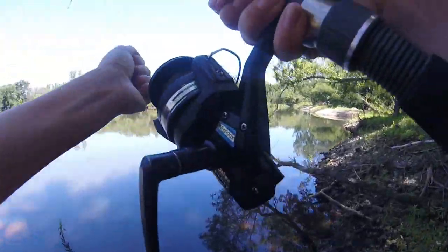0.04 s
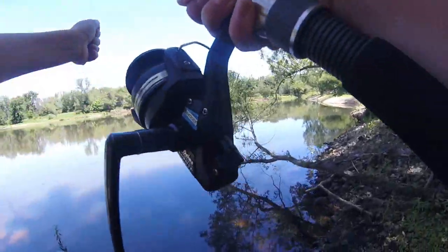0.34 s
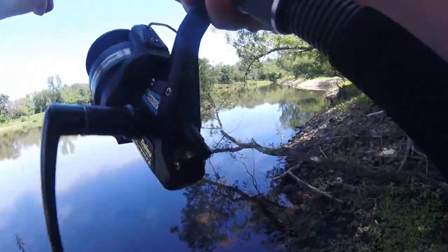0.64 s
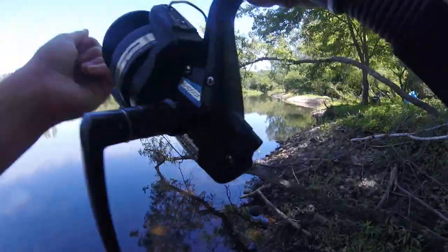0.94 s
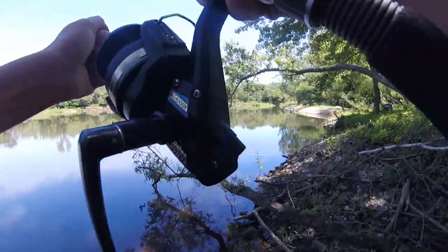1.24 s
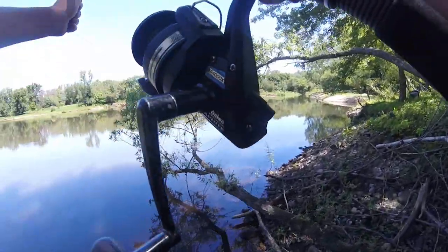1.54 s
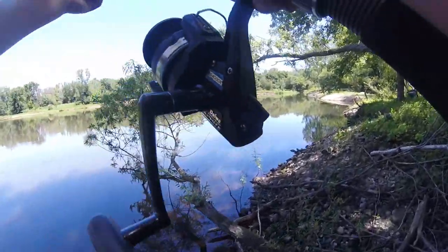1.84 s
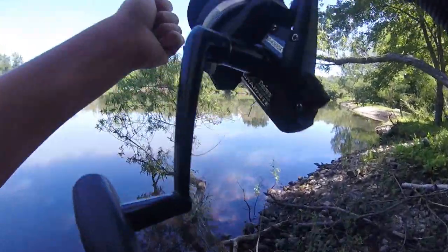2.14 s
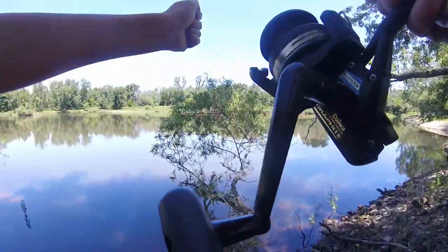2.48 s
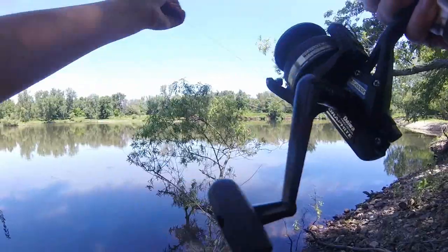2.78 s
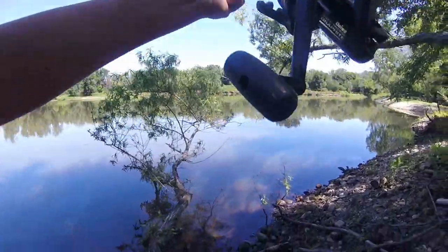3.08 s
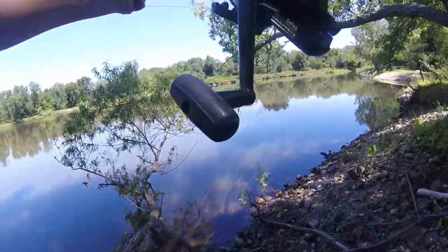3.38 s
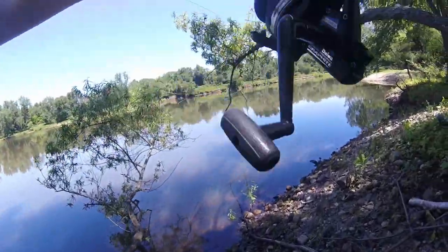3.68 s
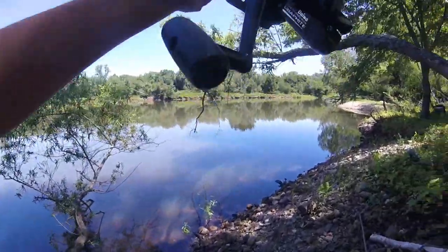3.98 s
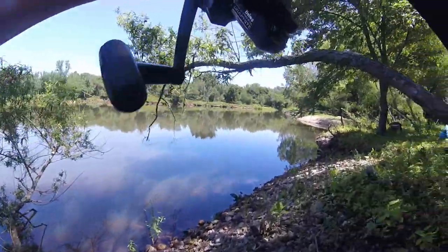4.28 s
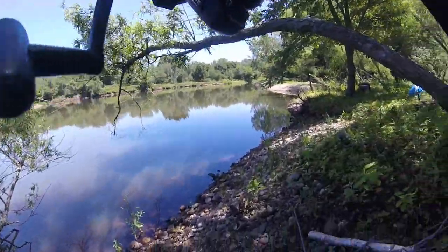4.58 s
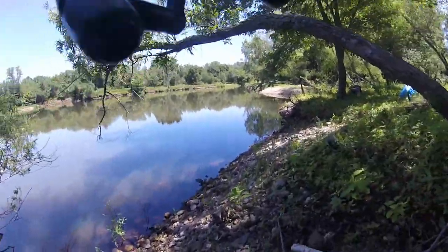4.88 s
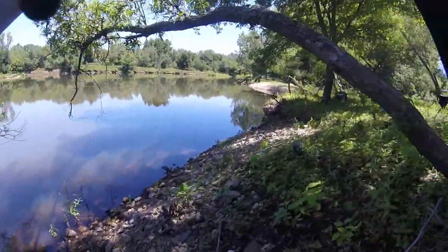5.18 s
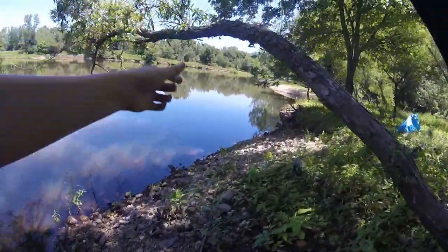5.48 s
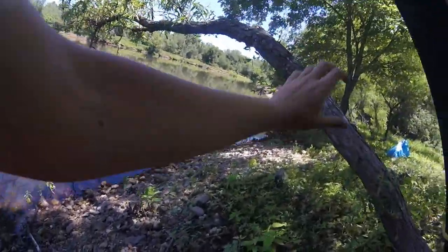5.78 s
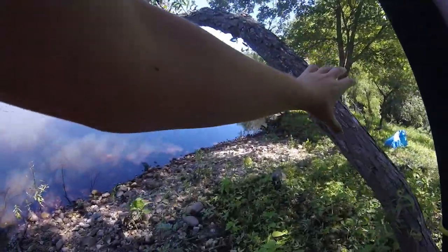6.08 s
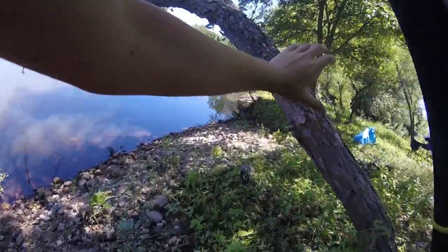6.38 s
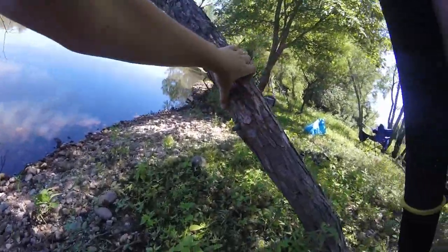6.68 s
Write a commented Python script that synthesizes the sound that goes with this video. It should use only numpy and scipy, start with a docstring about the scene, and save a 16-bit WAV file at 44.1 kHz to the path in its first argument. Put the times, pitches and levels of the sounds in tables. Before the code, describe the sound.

On a quiet riverbank, a fishing reel's handle clacks sharply, then the reel is cranked in five short bursts of fast, metallic ratchet clicks, about a second apart. Dull knocks and clothing rustle fall between them, close to a body-worn microphone. Later come one short soft gurgle and a few faint whistles. After the cranking stops, fabric crackles and small stones shift faintly underfoot. Light wind rumbles throughout.

```python
"""A spinning reel, cranked in five short bursts close to a body-worn camera on a quiet riverbank.
The anti-reverse pawl drops off each ratchet tooth, rebounds and rings the reel's body.
Tackle knocks, clothes rustle, stones shift underfoot and light wind rumbles on the microphone.
One short gurgle and a few faint whistles sound in the second half."""
import sys
import numpy as np
from scipy import signal
from scipy.fft import rfft, irfft, next_fast_len
from scipy.io import wavfile
from scipy.ndimage import uniform_filter1d

SR = 44100
rng = np.random.default_rng(int(sys.argv[2]) if len(sys.argv) > 2 else 0)


def to_wav(s):
    """Save 16-bit WAV."""
    ch = np.atleast_2d(s).T  # columns
    pcm = np.round(np.clip(ch, -1, 1) * 32767)  # PCM
    wavfile.write(sys.argv[1], SR, pcm.astype(np.int16))


N = 305613

# cranking, one table per burst: (time [s], tooth rate [1/s], level [dB])
CRANKS = [
    [(0.134, 80.9, -28), (0.2243, 77.7, -28.5), (0.2587, 64.0, -28.5), (0.2869, 77.1, -31),
     (0.3965, 67.4, -27.5), (0.5159, 105.0, -29), (0.5718, 85.1, -28), (0.6295, 23.0, -25)],
    [(1.284, 49.2, -28.5), (1.3614, 112.3, -28.5), (1.4619, 83.2, -29.5), (1.4894, 112.3, -27.5),
     (1.5579, 109.5, -29.5), (1.5802, 90.3, -30), (1.7041, 69.2, -28.5)],
    [(2.3677, 47.3, -27.5), (2.4227, 73.2, -29.5), (2.4652, 88.2, -30), (2.5298, 82.7, -29.5),
     (2.6239, 103.6, -28.5), (2.6797, 53.1, -30.5)],
    [(3.2424, 37.3, -36), (3.2991, 91.5, -30.5), (3.3411, 113.5, -30.5), (3.4538, 118.8, -32),
     (3.5223, 90.5, -29.5), (3.5753, 23.9, -33)],
    [(4.2297, 45.2, -35), (4.275, 78.0, -33.5), (4.3597, 88.7, -31.5), (4.3874, 100.6, -31.5),
     (4.5152, 91.8, -34.5), (4.5661, 49.9, -29.5)],
]
# reel body modes: (frequency [Hz], width [Hz], level [dB])
REEL_MODES = [(277, 77, -23), (426, 55, -8.5), (1074, 23, 5), (1142, 38, 6), (1637, 77, -0.5),
              (1990, 500, -11), (2946, 110, -4), (3310, 118, 1.5), (3670, 160, -5), (4030, 86, 2.5),
              (4370, 120, -1.5), (4970, 310, -1.5), (5380, 160, 2), (5820, 140, 5), (6430, 220, 3.5),
              (7030, 340, -2), (8390, 710, -2), (9290, 58, -8.5), (8700, 350, 0), (11500, 50, -11),
              (12700, 130, -43)]
# camera mount modes: (frequency [Hz], width [Hz], level [dB])
MOUNT_MODES = [(412, 87, -1), (546, 64, -3), (666, 100, -4), (972, 47, -2), (1520, 370, -14.5),
               (2380, 530, -15.5)]


def undb(db):
    """Decibels to gain."""
    return 10 ** (np.asarray(db) / 20)


def unit(x):
    """Scale to unit rms."""
    return x / np.sqrt(np.mean(x ** 2) + 1e-30)


def peak(x, db):
    """Scale to a peak level."""
    return x * undb(db) / np.abs(x).max()


def add(out, start_s, x):
    """Mix x into out."""
    i = max(int(start_s * SR), 0)
    out[i:i + len(x)] += x[:max(len(out) - i, 0)]


def colour(x, points):
    """Filter by (frequency [Hz], gain [dB]) points."""
    hz, db = np.transpose(points)
    size = next_fast_len(len(x))
    f = np.maximum(np.fft.rfftfreq(size, 1 / SR), 1)
    gain = undb(np.interp(np.log(f), np.log(hz), db))
    return irfft(rfft(x, size) * gain, size)[:len(x)]


def ring(modes, size=4096):
    """Minimum-phase impulse response of (frequency [Hz], width [Hz], level [dB]) modes."""
    f = np.maximum(np.fft.rfftfreq(size, 1 / SR), 10)
    power = sum(undb(db) ** 2 / (1 + ((f * f - hz * hz) / (f * width)) ** 2) for hz, width, db in modes)
    cepstrum = irfft(np.log(power) / 2)
    cepstrum[1:size // 2] *= 2
    cepstrum[size // 2 + 1:] = 0
    return irfft(np.exp(rfft(cepstrum)))


def lowpass(x, hz, order=2):
    """Butterworth low-pass."""
    return signal.sosfilt(signal.butter(order, hz, fs=SR, output="sos"), x)


def decay(t60_s, size=4096):
    """Exponential envelope."""
    return np.exp(-np.log(1000) * np.arange(size) / SR / t60_s)


def chatter(t60_s):
    """Dying flurry of micro-contacts, unit energy."""
    envelope = decay(t60_s)
    flurry = envelope * rng.standard_normal(len(envelope))
    return flurry / np.linalg.norm(flurry)


def strike(modes, chatter_db, t60_s, contact_hz, order):
    """One contact and its chatter, low-passed, ring a body."""
    force = undb(chatter_db) * chatter(t60_s)
    force[0] += 1
    return signal.fftconvolve(lowpass(force, contact_hz, order), ring(modes))


def soft_pushes(rows, t60_s, attack_s):
    """Soft uneven pushes, each on one resonance."""
    out = np.zeros(N)
    for time_s, peak_db, hz, width_hz in rows:
        push = chatter(t60_s)
        push *= 1 - np.exp(-np.arange(len(push)) / SR / attack_s)
        body = ring([(hz, width_hz, 0)], size=8192)
        add(out, time_s, peak(lowpass(signal.fftconvolve(push, body), 2 * hz), peak_db))
    return out


def drift(rate_hz):
    """Smooth random drift, unit rms."""
    hold = int(SR / rate_hz)
    steps = np.repeat(rng.standard_normal(N // hold + 1), hold)
    return unit(uniform_filter1d(steps, hold)[:N])


def air_and_wind(air_db=-53, breeze_db=-47.5, drift_db=-0.5, puff_s=0.058):
    """Still river air with a thin hiss; a light breeze puffs on the microphone."""
    # spectra: (frequency [Hz], density [dB])
    air_spectrum = [(50, -1.5), (85, -1), (130, -9.5), (220, -17), (420, -7), (800, -21), (1500, -25.5),
                    (2900, -26.5), (4000, -30.5), (5700, -33), (6550, -20.5), (7300, -31), (9500, -32),
                    (13000, -43.5)]
    wind_spectrum = [(6, -16), (14, 7), (28, 3.5), (50, -4.5), (85, -13.5), (160, -15.5), (400, -99.5)]
    # wind puffs: (crest time [s], level [dB])
    puffs = [(.16, -39.5), (.95, -39.5), (1.38, -41), (1.68, -44), (2.07, -41), (2.78, -43), (3.26, -38),
             (5.05, -44), (5.31, -41.5), (6.6, -45.5)]
    t = np.arange(N) / SR
    air = unit(colour(rng.standard_normal(N), air_spectrum)) * undb(air_db)
    breeze = undb(breeze_db + drift_db * drift(5))
    gusting = sum(undb(db) * np.exp(-((t - crest_s) / puff_s) ** 2) for crest_s, db in puffs)
    rumble = unit(colour(rng.standard_normal(N), wind_spectrum))
    return air + rumble * (breeze + gusting)


def handle_clacks():
    """The handle takes up slack and rings the reel."""
    # (time [s], peak [dB], contact bandwidth [Hz])
    clacks = [(0.0818, -15, 3220), (2.141, -34, 1140), (3.836, -35.5, 1760), (4.672, -28.5, 1730),
              (4.96, -34, 1600)]
    out = np.zeros(N)
    for time_s, db, contact_hz in clacks:
        clack = strike(REEL_MODES, chatter_db=3, t60_s=0.009, contact_hz=contact_hz, order=2)
        add(out, time_s, peak(clack, db))
    return out


def body_bumps():
    """The angler's body bumps softly against the mount."""
    # (time [s], peak [dB], resonance [Hz], width [Hz])
    bumps = [(.095, -38.5, 162, 89), (2.102, -32, 130, 50.4), (3.927, -32.5, 343, 35),
             (4.916, -36.5, 132, 60), (5.312, -39.5, 122, 70)]
    return soft_pushes(bumps, t60_s=0.13, attack_s=0.00043)


def pawl_force(rattle, rebound_s, rebound_db=-4, lead_in_db=-18, lead_in_samples=40):
    """The pawl drops, bounces once and rattles; a faint noise swell leads into the click."""
    drop = rattle.copy()
    drop[0] += 1
    add(drop, rebound_s, undb([rebound_db]))
    lead_in = np.linspace(0, 1, lead_in_samples) * rng.standard_normal(lead_in_samples)
    return np.r_[undb(lead_in_db) * lead_in, drop]


def tooth_times(crank):
    """Times [s] at which the ratchet has advanced one more tooth."""
    times_s, teeth_hz, _ = np.transpose(crank)
    t = np.arange(times_s[0], times_s[-1], 1 / SR)
    turned = np.cumsum(np.interp(t, times_s, teeth_hz)) / SR
    return np.interp(np.arange(int(turned[-1]) + 1), turned, t)


def ratchet(crank, facing, rebound_s=0.0019, chatter_t60_s=0.018, likeness=0.7, detune=0.0094,
            jitter_s=0.0002, lead_s=0.0007, click_s=0.0064, snap_db=-11):
    """Each pawl drop snaps and rings the reel a little differently; the hand reflects it."""
    times_s, _, levels_db = np.transpose(crank)
    *tilt_db, chatter_db, echo_s, echo_db = facing
    mode_hz, width_hz, mode_db = np.transpose(REEL_MODES)
    mode_db = mode_db + np.interp(mode_hz, [1600, 3000, 5800, 8500], [0, *tilt_db])
    snap = ring([(5000, 3000, 0)])
    snap *= undb(snap_db) / np.linalg.norm(snap)
    direct = np.zeros(N)
    rattle = chatter(chatter_t60_s)
    teeth_s = tooth_times(crank)
    for drop_s in teeth_s + jitter_s * rng.standard_normal(len(teeth_s)):
        late, strength, loose = rng.standard_normal(3)
        shift, share = rng.standard_normal((2, len(mode_hz)))
        # neighbouring teeth rattle alike, so the colour drifts as the rotor turns
        rattle = likeness * rattle + np.sqrt(1 - likeness ** 2) * chatter(chatter_t60_s)
        force = pawl_force(rattle * undb(chatter_db + 2 * loose), rebound_s + 0.0001 * late)
        body = ring(zip(mode_hz * (1 + detune * shift), width_hz, mode_db + 2.5 * share))
        click = signal.fftconvolve(force, body)
        add(click, np.argmax(force) / SR, snap * np.linalg.norm(click))
        click *= np.sqrt(click_s * SR) / np.linalg.norm(click)  # energy of unit rms over click_s
        click_db = np.interp(drop_s, times_s, levels_db) + 1.5 * strength
        add(direct, drop_s - lead_s, click * undb(click_db))
    i = np.arange(N)
    echo = undb(echo_db) * np.interp(i - echo_s * SR, i, direct)
    return lowpass(direct + echo, hz=11000, order=3)


def reel():
    """Five ratchet bursts, each facing the microphone differently."""
    # per burst: (gain at 3 kHz [dB], at 5.8 kHz [dB], at 8.5 kHz [dB], chatter [dB],
    # hand echo delay [s], echo [dB])
    facings = [(3, 5, -7, 6.5, 0.00085, -23), (6.5, 0, -2.5, 4, 0.00019, -12.5),
               (2, -2.5, -1, 8.5, 0.000558, -15), (3.5, -7.5, -2.5, 7.5, 0.000393, -13),
               (2.5, -6, -4.5, 14.5, 0.00059, -11.5)]
    return sum(ratchet(crank, facing) for crank, facing in zip(CRANKS, facings))


def slips(rate_hz, spread_db):
    """Tiny random slips of uneven size."""
    sizes = undb(spread_db * np.minimum(rng.exponential(size=N), 4))
    return (rng.random(N) < rate_hz / SR) * sizes * rng.standard_normal(N)


def swell(start_s, length_s, attack_share=0.21, release_s=0.023):
    """Envelope of one movement: attack, hold, release."""
    t = np.arange(N) / SR - start_s
    attack = np.clip(t / (attack_share * length_s), 0, 1)
    return attack * np.exp(-np.maximum(t - length_s, 0) / release_s)


def clothes(rest_db=(-58, -84), sleeve_db=(-50.5, -48), catch_db=2):
    """Fabric rubs on the mount and crinkles with movement; it catches, taps and crackles at random."""
    # arm and cloth movements: (start [s], length [s], rubbing gain [dB], crinkling gain [dB])
    moves = [(.68, 0.24, -49.5, -57.5), (1.72, 0.29, -52, -63), (2.06, .08, -46.5, -88),
             (2.82, 0.16, -49.5, -53), (3.04, .11, -49.5, -53.5), (3.82, 0.28, -49, -59.5),
             (4.0, 0.53, -51.5, -49), (4.55, 0.31, -49.5, -60), (4.835, 0.088, -42.5, -40.5),
             (4.88, .51, -51, -52), (5.38, .15, -53, -59.5), (5.642, 0.022, -47.5, -44.5),
             (5.67, 0.13, -48, -51.5), (5.75, .52, -60.5, -62), (6.27, 0.065, -50, -53),
             (6.5, 0.36, -57.5, -55), (6.7, .05, -66, -52.5), (6.75, 0.16, -48.5, -50)]
    # spectra: (frequency [Hz], density [dB])
    rub_spectrum = [(88, -38), (150, 4.5), (182, 0.5), (290, 1), (420, 0), (895, -7), (945, -5), (1100, -6),
                    (4000, -30.5), (5200, -83), (8800, -120)]
    crinkle_spectrum = [(880, -8), (1500, 4), (3050, -1.5), (4600, -1), (5300, -3), (6450, 1), (9540, -15),
                        (10200, -13.5), (11100, -20), (14000, -25)]
    cranking = [(crank[0][0], crank[-1][0] - crank[0][0], *sleeve_db) for crank in CRANKS]
    move_power = sum(np.outer(undb(gains_db), swell(start_s, length_s)) ** 2
                     for start_s, length_s, *gains_db in moves + cranking)
    rub_gain, crinkle_gain = np.sqrt(undb(rest_db)[:, None] ** 2 + move_power)
    rub = unit(colour(slips(rate_hz=1800, spread_db=2), rub_spectrum)) * undb(-2)
    tap_force = slips(rate_hz=70, spread_db=-1)
    taps = unit(signal.fftconvolve(tap_force, ring(MOUNT_MODES))[:N]) * undb(-8)
    crinkle = unit(colour(slips(rate_hz=3500, spread_db=0), crinkle_spectrum)) * undb(-3)
    creases = signal.fftconvolve(np.abs(slips(rate_hz=55, spread_db=-1.2)), decay(0.021))[:N]
    crackle = unit(colour(creases * rng.standard_normal(N), crinkle_spectrum)) * undb(-6)
    catching = unit(undb(catch_db * drift(60)))
    return catching * (rub_gain * (rub + taps) + crinkle_gain * (crinkle + crackle))


def mount_knocks():
    """Dull contacts ring the camera mount."""
    # (time [s], peak [dB], contact bandwidth [Hz])
    knocks = [(.548, -26.5, 600), (.868, -31.5, 900), (.9585, -27, 1300), (.970, -24, 900),
              (1.921, -34.5, 1000), (2.719, -30, 500), (2.910, -29.5, 1000), (2.923, -29.5, 900),
              (4.721, -26, 1200), (4.845, -28.5, 1400), (4.862, -27, 800), (4.897, -31, 700),
              (5.702, -30.5, 900)]
    out = np.zeros(N)
    for time_s, db, contact_hz in knocks:
        knock = strike(MOUNT_MODES, chatter_db=2, t60_s=0.025, contact_hz=contact_hz, order=1)
        add(out, time_s, peak(knock, db))
    return out


def crisp_snaps(width_hz=5500, trim_db=-2):
    """Cloth, straps and twigs snap, each on one broad resonance."""
    # (time [s], peak before trim [dB], centre [Hz])
    snaps = [(0.7297, -34, 1670), (1.9325, -34, 6130), (2.831, -31.5, 5900), (2.95, -31.5, 5160),
             (3.1336, -33, 6500), (3.7969, -30, 5700), (4.879, -26, 6360), (4.8926, -20, 4560),
             (4.901, -21.5, 6530), (5.182, -34, 1500), (5.3658, -30, 1710), (6.0778, -33.5, 7800),
             (6.4813, -32.5, 2900), (6.737, -28.5, 6600), (6.82, -34, 5660)]
    out = np.zeros(N)
    for time_s, db, hz in snaps:
        snap = strike([(hz, width_hz, 0)], chatter_db=12, t60_s=0.02, contact_hz=8000, order=4)
        add(out, time_s, peak(snap, db + trim_db))
    return out


def gurgle(start_s=3.965, gap_s=0.019, first_db=-37, step_db=3, first_hz=670, step_hz=225, width_hz=85):
    """Three quick soft pulses, each higher and louder than the last."""
    pulses = [(start_s + k * gap_s, first_db + k * step_db, first_hz + k * step_hz, width_hz)
              for k in range(3)]
    return soft_pushes(pulses, t60_s=0.068, attack_s=0.0027)


def whistles(half_width_hz=100):
    """Faint, thin, breathy whistles: narrow noise bands that glide in pitch."""
    # (start [s], length [s], start pitch [Hz], end pitch [Hz], rms [dB])
    glides = [(3.97, 0.37, 2560, 2960, -57.5), (4.594, 0.24, 3320, 3040, -65.5),
              (6.499, .06, 4030, 4200, -60), (6.559, 0.14, 2880, 2750, -68)]
    out = np.zeros(N)
    for start_s, length_s, start_hz, end_hz, db in glides:
        progress = np.linspace(0, 1, int(length_s * SR))
        phase = 2 * np.pi * np.cumsum(start_hz + (end_hz - start_hz) * progress) / SR
        in_phase, quadrature = lowpass(rng.standard_normal((2, SR)), half_width_hz)[:, :len(progress)]
        tone = in_phase * np.cos(phase) + quadrature * np.sin(phase)
        add(out, start_s, unit(np.sin(np.pi * progress) * tone) * undb(db))
    return out


def stones(rate_hz=160, centre_hz=903, spread_oct=0.503, t60_s=0.031, spread_db=4):
    """Small stones knock together underfoot, each with its own short ring."""
    # shoe shifts: (start [s], length [s], level [dB])
    scuffs = [(3.979, 0.27, -57.5), (4.953, .45, -57.5), (5.701, 0.18, -55), (5.87, .6, -61),
              (6.741, 0.18, -53.5)]
    out = np.zeros(N)
    envelope = decay(t60_s)
    t = np.arange(len(envelope)) / SR
    for start_s, length_s, db in scuffs:
        clatter = np.zeros(N)
        for k, (late, pitch, strength) in enumerate(rng.standard_normal((int(length_s * rate_hz), 3))):
            hz = centre_hz * 2 ** (spread_oct * pitch)
            knock = undb(spread_db * strength) * np.sin(2 * np.pi * hz * t) * envelope
            add(clatter, start_s + (k + late) / rate_hz, knock)
        out += clatter * undb(db) * np.sqrt(length_s * SR) / np.linalg.norm(clatter)
    return out


def scene():
    """Mono mix, dry in the open air."""
    angler = reel() + body_bumps() + handle_clacks() + mount_knocks() + crisp_snaps() + clothes()
    return (angler + gurgle() + air_and_wind() + whistles() + stones())[None]


def record(dry, notch_hz=10000, notch_width_hz=700, top_hz=13400):
    """The microphone port notches the treble; the camera cuts the top."""
    ported = signal.lfilter(*signal.iirnotch(notch_hz, notch_hz / notch_width_hz, fs=SR), dry)
    return signal.sosfilt(signal.ellip(8, 0.2, 70, top_hz, fs=SR, output="sos"), ported)


dry = scene()
out = record(dry)
to_wav(out)
```